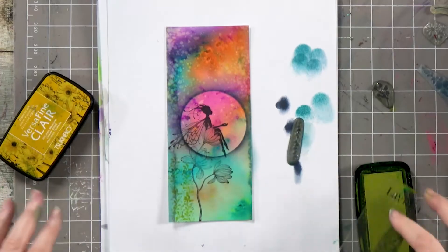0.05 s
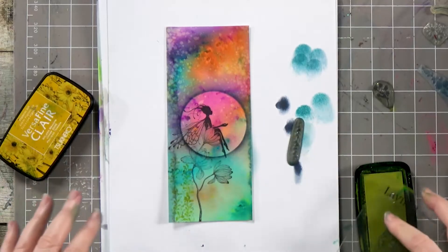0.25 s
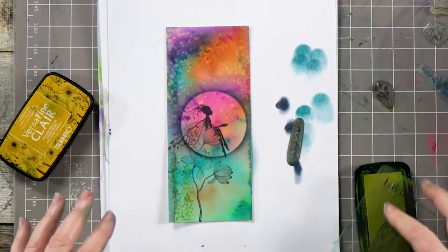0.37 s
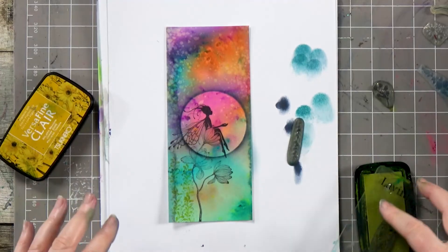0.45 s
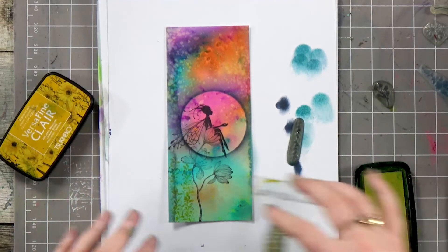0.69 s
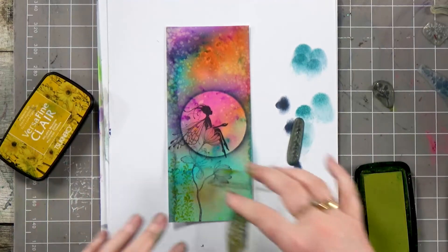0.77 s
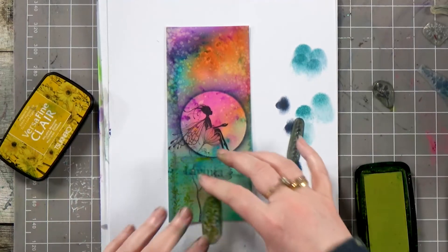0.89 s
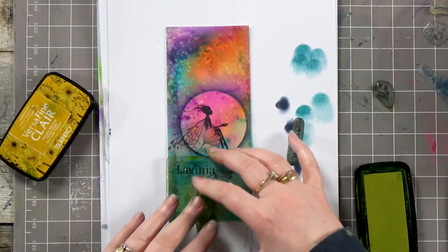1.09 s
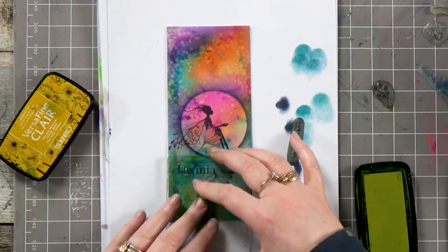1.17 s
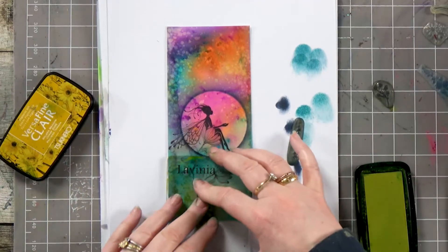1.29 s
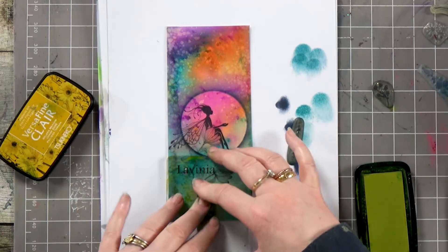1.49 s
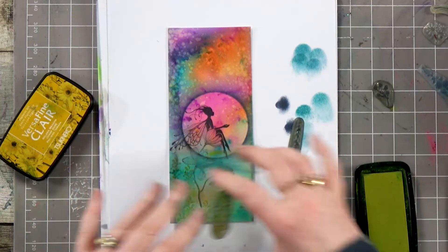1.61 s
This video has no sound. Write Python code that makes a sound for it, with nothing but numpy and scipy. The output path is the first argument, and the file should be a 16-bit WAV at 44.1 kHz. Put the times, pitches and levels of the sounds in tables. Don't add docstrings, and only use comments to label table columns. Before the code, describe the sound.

An acrylic stamp block knocks a hollow ink pad on a table three times, at about 0.2, 0.37 and 0.52 seconds. Each has a tiny edge click, then a short boxy thud with low table boom; the second is duller, the third has the heaviest thud. Close microphone, small room with short reverberation. Quiet hum and hiss follow, with a faint card scuff and snap near 1.63 seconds.

```python
import sys
import numpy as np
from scipy import signal
from scipy.fft import rfft, irfft, next_fast_len
from scipy.io import wavfile
from scipy.ndimage import uniform_filter1d

SR = 44100
rng = np.random.default_rng(int(sys.argv[2]) if len(sys.argv) > 2 else 0)


def unload_wav(signal):
    wavfile.write(
        sys.argv[1],
        SR,
        np.round(np.clip(np.atleast_2d(signal).T, -1, 1) * 32767).astype(np.int16),
    )


def natural_amplitude(level_db):
    exponent = np.asarray(level_db, float) / 20
    return 10 ** exponent


N = 72765


def unit(x):
    return x / np.sqrt(np.mean(x ** 2) + 1e-20)


def along(points, hz):
    f, v = np.transpose(points)
    return np.interp(np.log(hz + 1), np.log(f + 1), v)


def filtered(x, response):
    m = next_fast_len(x.shape[-1] + 8192)
    return irfft(rfft(x, m) * response(np.fft.rfftfreq(m, 1 / SR)), m)[..., :x.shape[-1]]


def ring(modes, t, attack_s):
    hz, db, t60 = np.transpose(modes)[:, :, None]
    t = np.maximum(t, 0)
    db = db + 0.7 * rng.standard_normal(hz.shape)
    decaying = natural_amplitude(db - 60 * t / t60) * np.sin(2 * np.pi * hz * t)
    return decaying.sum(0) * (1 - np.exp(-t / attack_s))


def rush(spectrum, alike, patchy_db):
    z = signal.stft(rng.standard_normal((2, N)), nperseg=512)[2]
    field = uniform_filter1d(rng.standard_normal(z.shape[1:]), size=3, axis=0)
    field = uniform_filter1d(field, size=12, axis=1)
    pair = signal.istft(z * natural_amplitude(patchy_db * unit(field)), nperseg=512)[1][:, :N]
    closed = list(spectrum) + [(spectrum[-1][0] * 1.3, -90)]

    def mid_side(hz):
        turn = np.arccos(np.clip(along(alike, hz), -1, 1)) / 2
        return natural_amplitude(along(closed, hz)) * [np.cos(turn), np.sin(turn)]

    mid, side = filtered(pair, mid_side)
    return unit(np.array([mid + side, mid - side]))


# frequency in Hz, level in dB, t60 in seconds.
TABLE_TOP = [(200, -16, .03), (335, -4, .03), (455, -5, .04)]
# frequency in Hz, level in dB, t60 in seconds.
PAD_LID = [(600, -3, .028), (680, -8, .03)]
# frequency in Hz, level in dB, t60 in seconds.
PAD_CASE = [(770.5, -2.5, 0.037), (729.3, -13, 0.076)]
# frequency in Hz, level in dB, t60 in seconds.
PAD_UPPER = [(956, 17.5, 0.016), (1089, 4, 0.04), (1350, -16, 0.075)]


def flat_blow(t, thud_db, case_db, upper_db):
    sink_s = 0.0003
    blow = -natural_amplitude(thud_db) * ring(TABLE_TOP, t - sink_s, attack_s=0.0009)
    for modes, db in ((PAD_LID, thud_db), (PAD_CASE, case_db), (PAD_UPPER, upper_db)):
        blow = blow + natural_amplitude(db) * ring(modes, t, attack_s=0.0012)
    return blow


def soft_press(t, case_db):
    press_s, press_db = 0.006, -15
    fade = natural_amplitude(-60 * np.maximum(t, 0) / press_s)
    swell = ring([(681, 0.0086, 0.91)], t + press_s, attack_s=press_s)
    return natural_amplitude(case_db + press_db) * fade * swell


# frequency in Hz, level in dB, t60 in seconds.
TABLE_FRAME = [(27.5, -28.5, 0.73), (71.6, -17, 0.15), (121, -12, 0.096), (110.25, -26.5, 0.64),
               (216.1, -20.5, 0.24), (394.6, -19, 0.29), (572, -11, 0.059)]


def frame_thud(t, thud_db):
    return -natural_amplitude(thud_db) * ring(TABLE_FRAME, t, attack_s=0.004)


# frequency in Hz, level in dB, t60 in seconds.
ACRYLIC = [(1794, 2, 0.012), (2079, 2.5, 0.025), (2340, -4, 0.041), (2820, 1, 0.013)]
# frequency in Hz, level in dB.
TICK_TINT = [(500, -6), (1200, 5), (2500, 9), (4200, 2), (6300, 0), (9000, -7.5), (15000, -13.5)]


def edge_tick(s, db, cut_hz):
    t = np.arange(N) / SR - s
    grit = rng.standard_normal(N) * natural_amplitude(-60 * abs(t) / 0.014) * (t >= 0)
    click = natural_amplitude(13) * (np.arange(N) == round(s * SR))
    contact = filtered(click + grit, lambda hz: natural_amplitude(along(TICK_TINT, hz)))
    tick = contact + natural_amplitude(-8) * ring(ACRYLIC, t, attack_s=0.0001)
    return natural_amplitude(db) * filtered(tick, lambda hz: 1 / (1 + 1j * hz / cut_hz))


TICK_TIMES = [
    0.2038,
    0.3696,
    0.5224,
]
# level in dB, cut-off in Hz.
TICK_FORCE = [
    (-40, 12000),
    (-41.5, 2740),
    (-35, 7700),
]
BLOW_TIMES = [
    0.2057,
    0.3713,
    0.5241,
]
# thud level in dB, pad case level in dB, upper mode level in dB.
BLOW_FORCE = [
    (-21.5, -13, -35),
    (-22, -23.5, -44),
    (-20, -19, -41),
]
# frequency in Hz, left over right in dB.
STEREO_LEAN = [(100, -2.5), (180, 10), (350, -5), (700, 2), (1400, -4.5), (3000, 0.5), (8000, 2.5)]


def knocks():
    t = np.arange(N) / SR
    blows, frame, ticks = 0, 0, 0
    for s, (thud_db, case_db, upper_db) in zip(BLOW_TIMES, BLOW_FORCE):
        blows = blows + flat_blow(t - s, thud_db, case_db, upper_db) + soft_press(t - s, case_db)
        frame = frame + frame_thud(t - s, thud_db)
    for s, (db, cut_hz) in zip(TICK_TIMES, TICK_FORCE):
        ticks = ticks + edge_tick(s, db, cut_hz)
    heard = blows + frame + ticks + room(blows, ticks)
    return filtered(heard, lambda hz: natural_amplitude(along(STEREO_LEAN, hz) * [[.5], [-.5]]))


# delay in seconds, level in dB.
REFLECTIONS = [
    (.0090, -13),
    (.0104, -8),
    (.0208, -22),
    (.0276, -19),
    (.0325, -19),
]
# frequency in Hz, t60 in seconds.
ROOM_DECAY = [(30, 0.44), (160, 0.57), (420, 0.32), (800, 0.22), (1300, .2), (2900, 0.25), (7700, 0.15)]


def room(blows, ticks):
    def late(hz, s):
        return np.exp(-2j * np.pi * hz * s)

    def slap_back(hz):
        echoes = sum(natural_amplitude(db) * late(hz, s) for s, db in REFLECTIONS)
        return echoes / (1 + 1j * hz / 1950)

    hz, t, z = signal.stft(rng.standard_normal((2, SR // 2)), SR, nperseg=256)
    a, b = signal.istft(z * natural_amplitude(-60 * t / along(ROOM_DECAY, hz)[:, None]), SR, nperseg=256)[1]
    turn = np.arccos(0.94) / 2
    mid, side = np.cos(turn) * a, np.sin(turn) * b
    tail = np.array([mid + side, mid - side]) / np.linalg.norm(a)
    slaps = filtered(blows + ticks, slap_back)
    gap_s = 0.014
    fed = natural_amplitude(-10) * filtered(blows, lambda hz: late(hz, gap_s)) + natural_amplitude(-0.5) * ticks
    return slaps + signal.fftconvolve(fed[None], tail, axes=1)[:, :N]


# time in seconds, level in dB.
STROKE = [
    (1.604, -99),
    (1.613, -62),
    (1.62, -56.5),
    (1.628, -48.5),
    (1.636, -60),
    (1.65, -65),
]
# frequency in Hz, level in dB per Hz.
CARD_COLOUR = [(500, -54), (900, -14), (1500, -7), (2600, -22), (4000, -8), (5000, -21), (6500, -14),
               (15700, -29.5)]
# start in seconds, level in dB, frequency in Hz, t60 in seconds.
CARD_SNAPS = [
    (1.6265, -48, 5800, .005),
    (1.6265, -52, 8800, .004),
    (1.618, -55, 3970, .07),
    (1.6335, -47, 1300, .006),
    (1.6255, -51, 1500, .012),
]


def card():
    t = np.arange(N) / SR
    stroke = natural_amplitude(np.interp(t, *np.transpose(STROKE), left=-120))
    grain = natural_amplitude(1.2 * rng.standard_normal(N // 40 + 1)).repeat(40)[:N]
    grit = unit(rush(CARD_COLOUR, [(1000, 0.91)], patchy_db=1) * grain)
    snaps = 0
    for s, db, hz, t60 in CARD_SNAPS:
        decay = natural_amplitude(db - 60 * abs(t - s) / t60) * (t >= s)
        snaps = snaps + decay * np.sin(2 * np.pi * hz * (t - s))
    return stroke * grit + snaps


# frequency in Hz, level in dB per Hz.
HUM_COLOUR = [(20, -14), (48, -9), (130, -12), (360, -7.5), (650, -12.5), (810, -9.5), (1300, -12),
              (1550, -25)]
# frequency in Hz, left-right likeness from 0 to 1.
HUM_LIKENESS = [(50, 0.65), (500, 0.81), (1400, 0.84)]
# frequency in Hz, level in dB per Hz.
HISS_COLOUR = [(940, -49), (1600, -6), (2710, -8), (3120, -8.5), (10700, -7.5), (15700, -13)]
# frequency in Hz, left-right likeness from 0 to 1.
HISS_LIKENESS = [(1600, 0.62), (4200, 0.86), (5000, 0.48), (10000, 0.13), (15000, 0.6)]


def floor():
    hum = rush(HUM_COLOUR, HUM_LIKENESS, patchy_db=0.5)
    hiss = rush([(30, -46)] + list(HISS_COLOUR), HISS_LIKENESS, patchy_db=2.0)
    return natural_amplitude(-61.5) * hum + natural_amplitude(-69) * hiss


def scene():
    return knocks() + card() + floor()


def roll_off(x):
    return signal.sosfilt(signal.butter(12, 16110, fs=SR, output="sos"), x)


def record(dry):
    mix = filtered(dry, lambda hz: hz < 15780)
    return roll_off(mix)


dry = scene()
out = record(dry)
unload_wav(out)
```